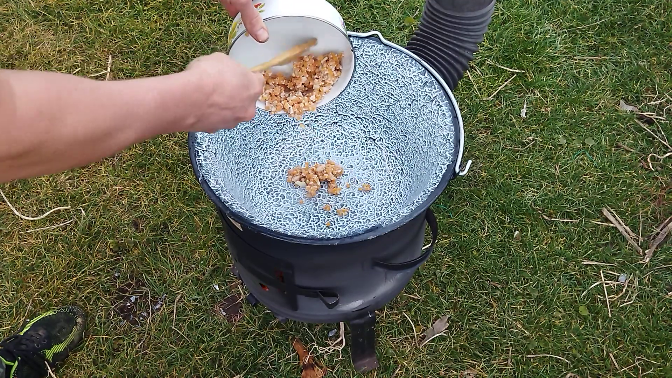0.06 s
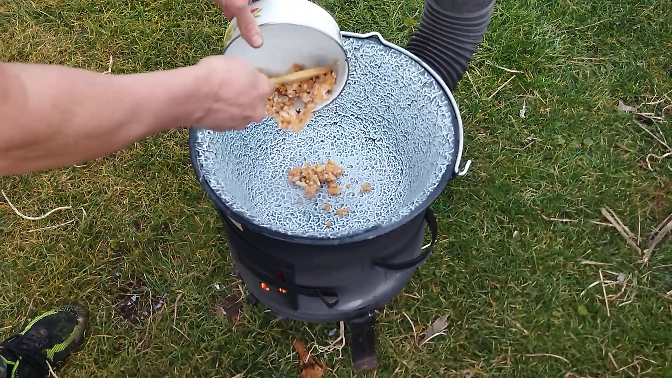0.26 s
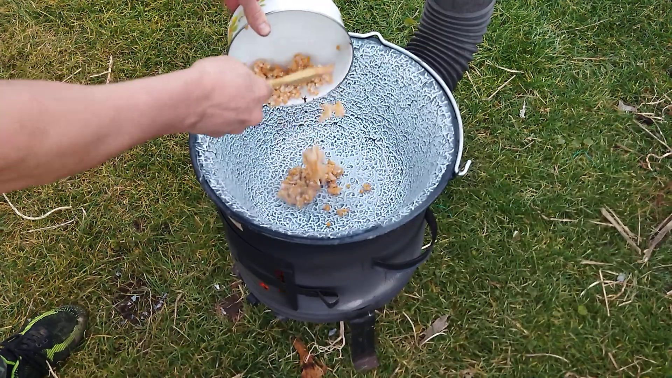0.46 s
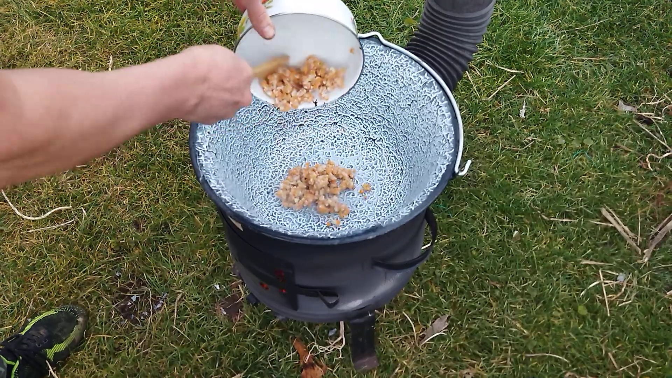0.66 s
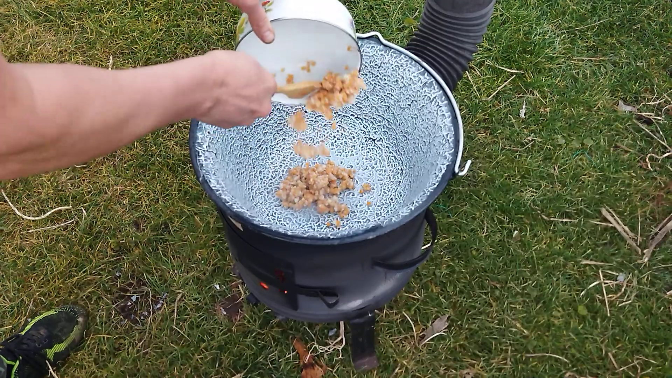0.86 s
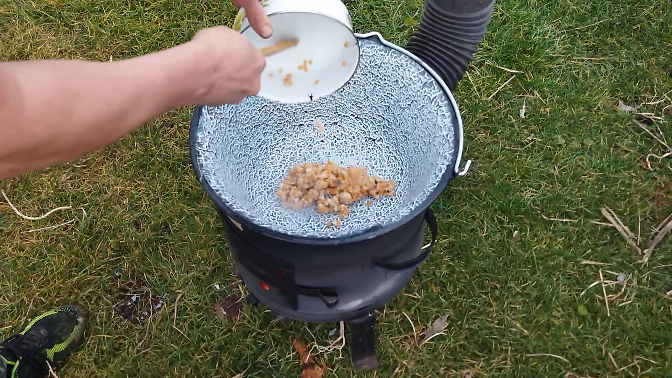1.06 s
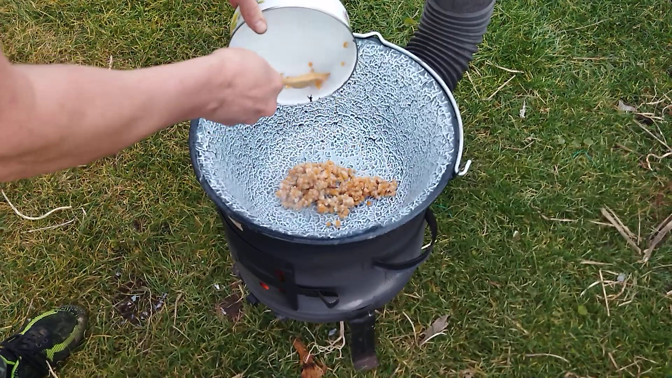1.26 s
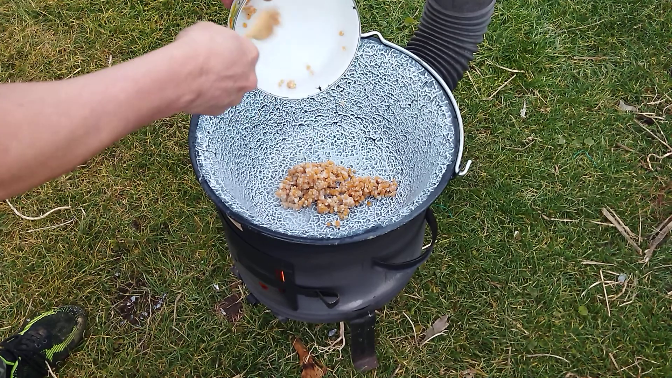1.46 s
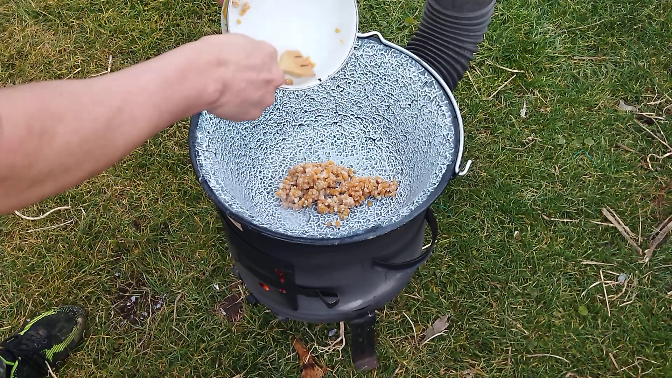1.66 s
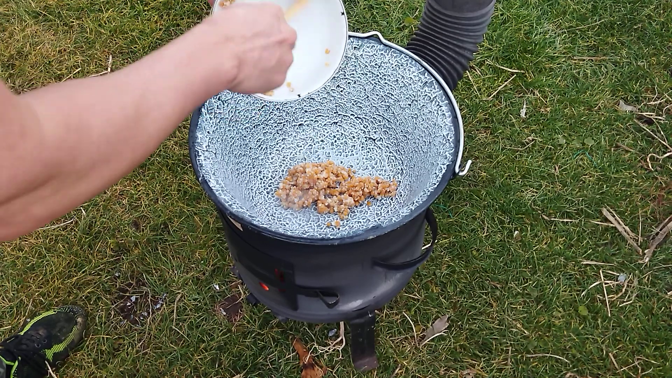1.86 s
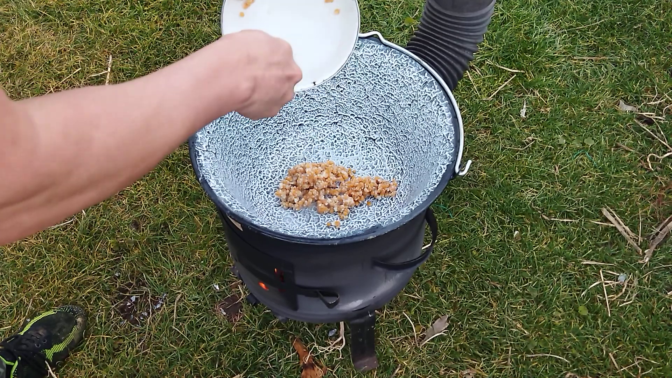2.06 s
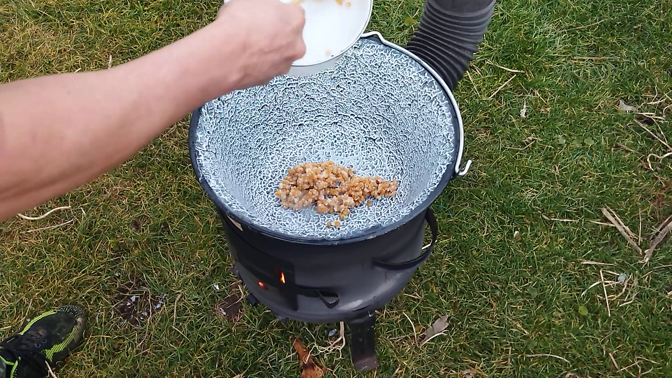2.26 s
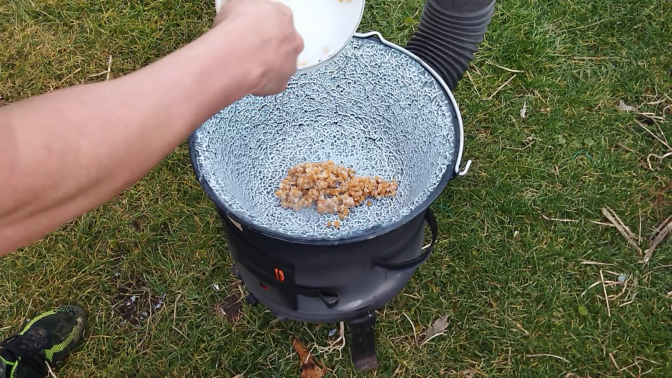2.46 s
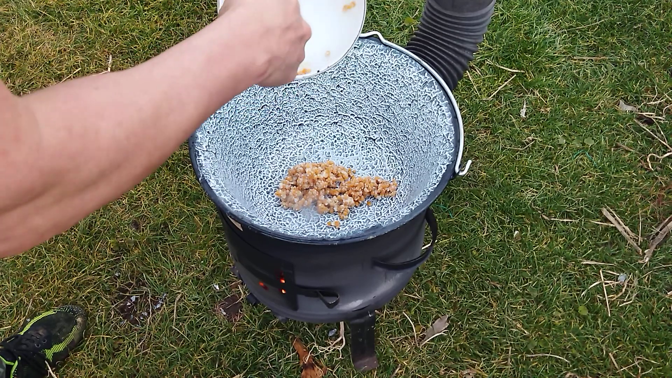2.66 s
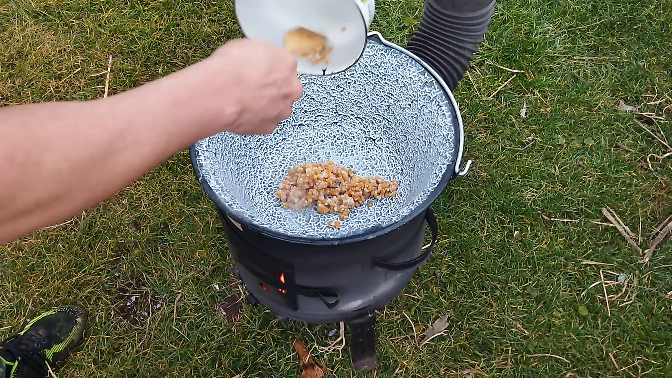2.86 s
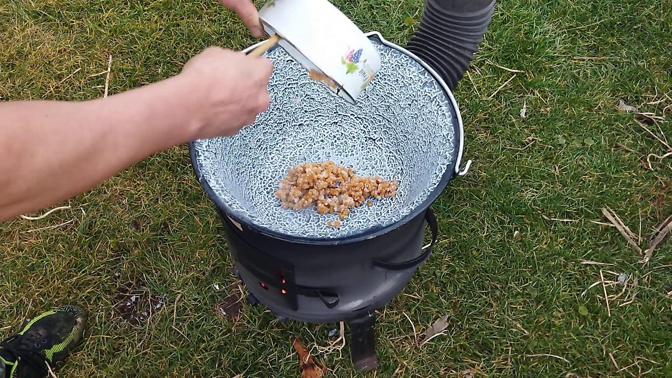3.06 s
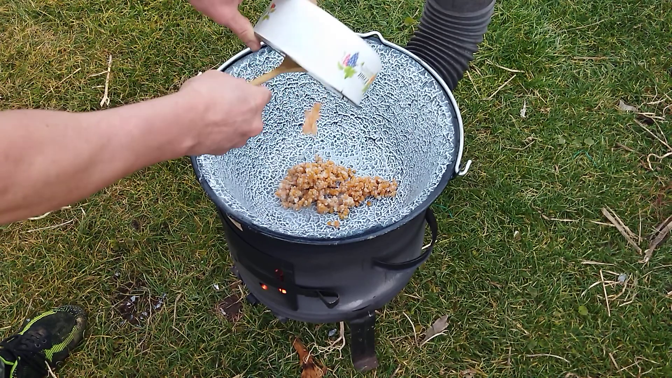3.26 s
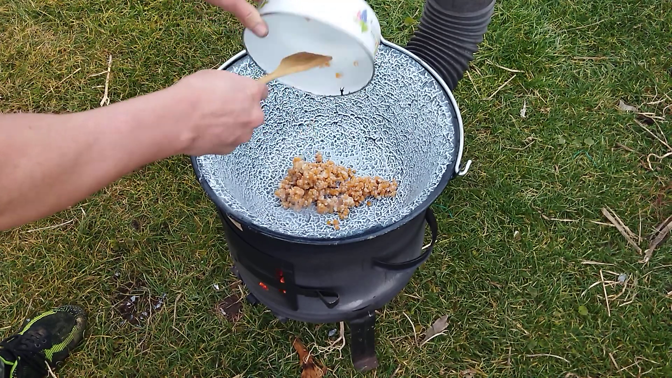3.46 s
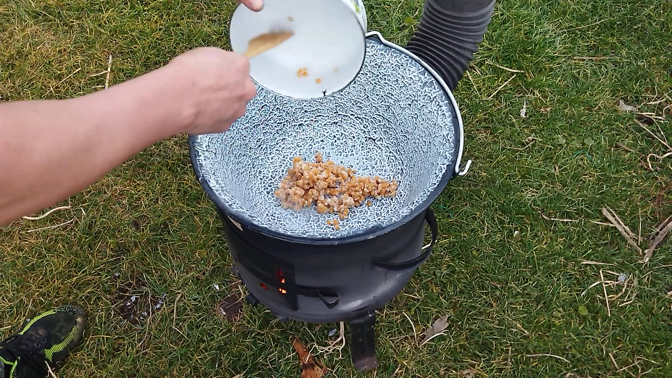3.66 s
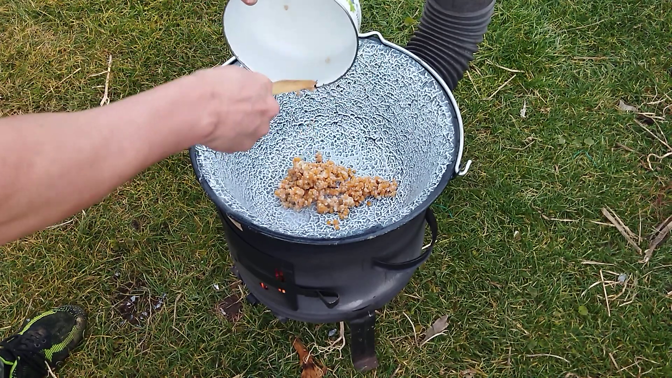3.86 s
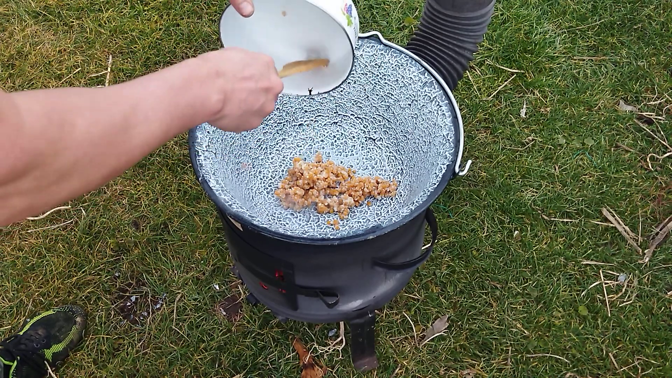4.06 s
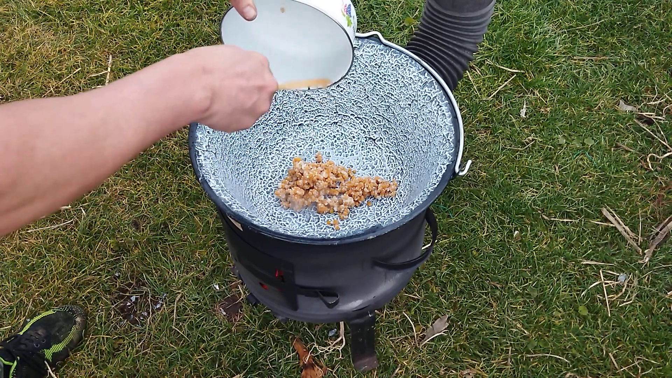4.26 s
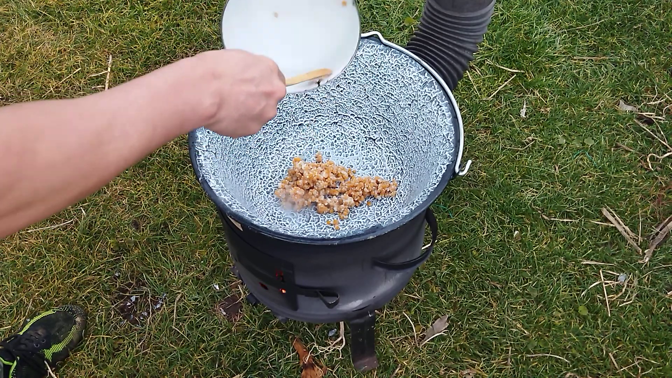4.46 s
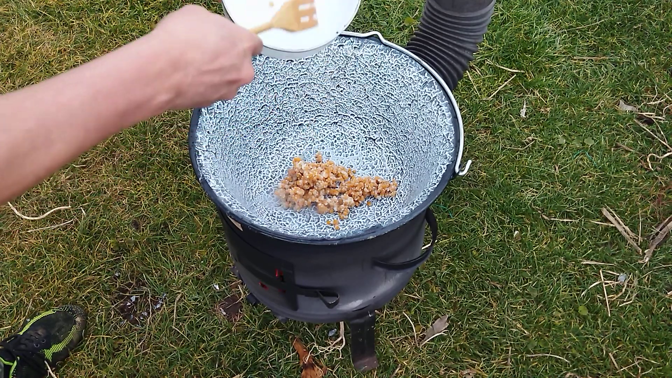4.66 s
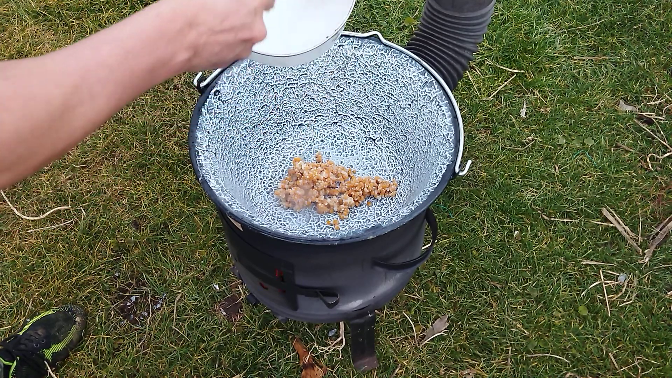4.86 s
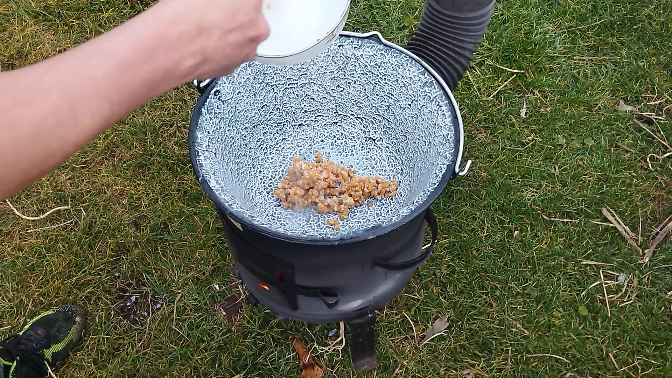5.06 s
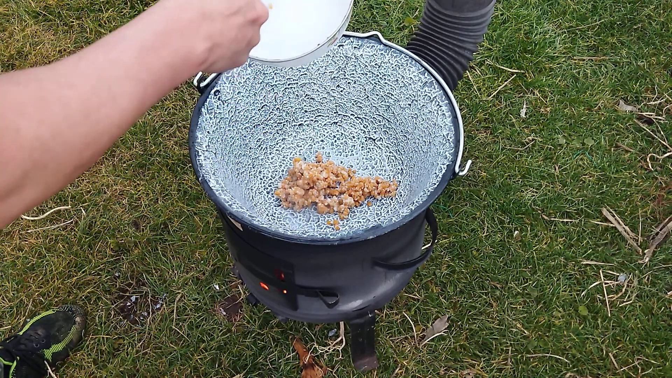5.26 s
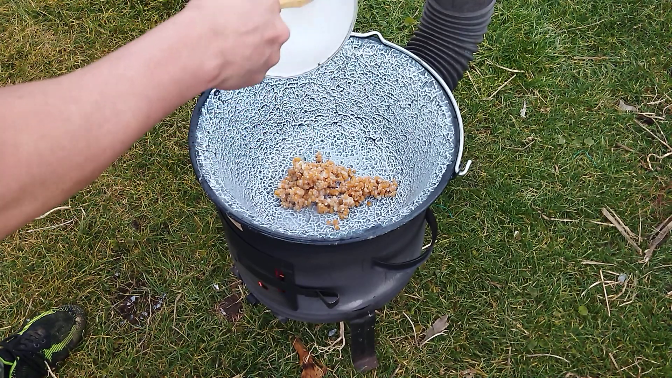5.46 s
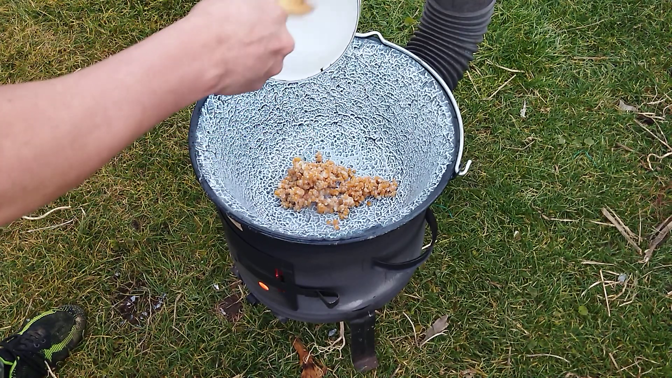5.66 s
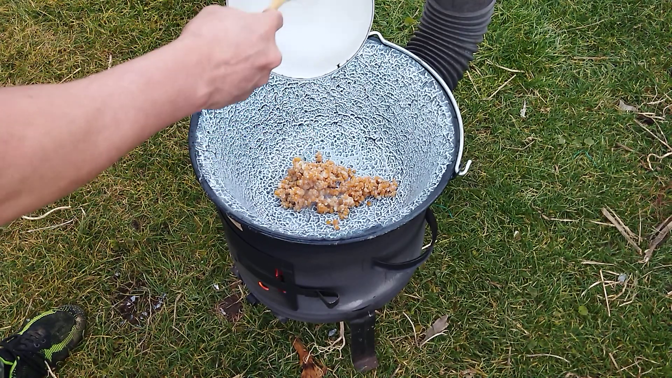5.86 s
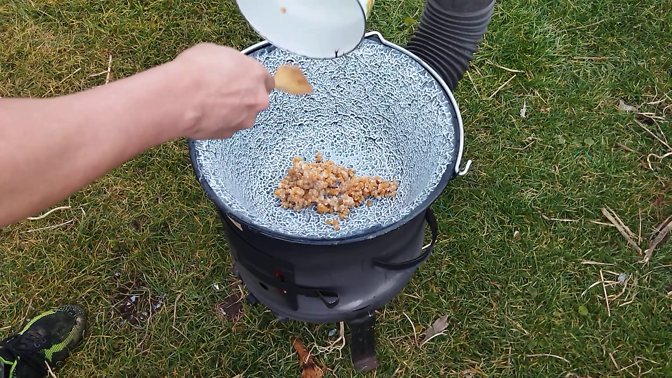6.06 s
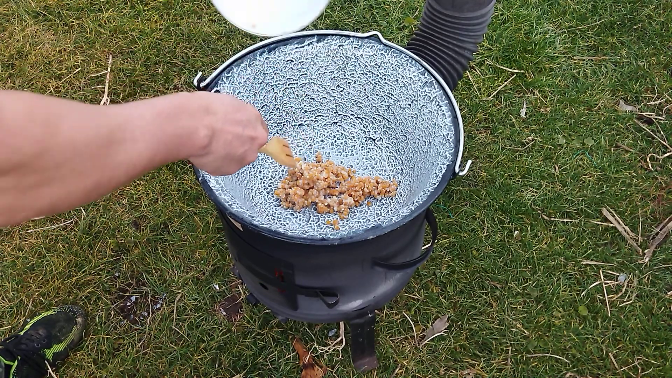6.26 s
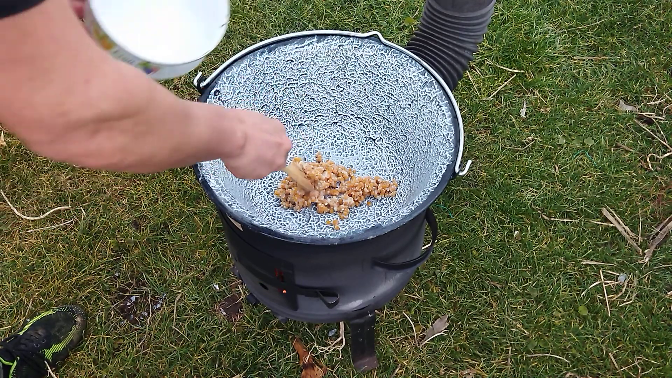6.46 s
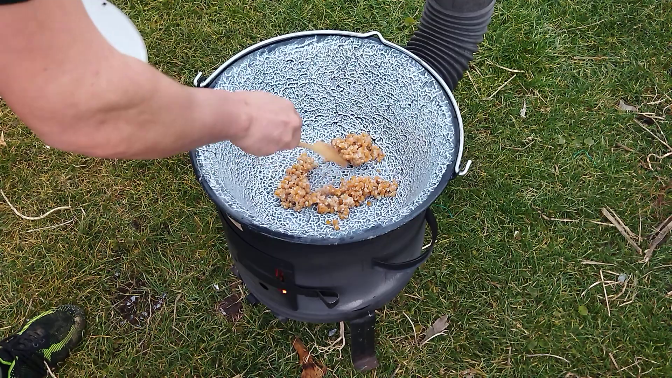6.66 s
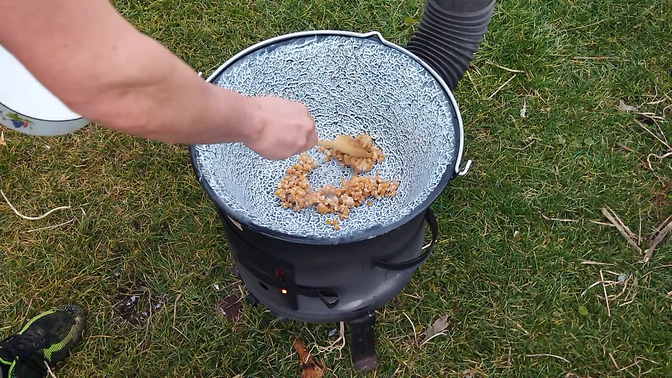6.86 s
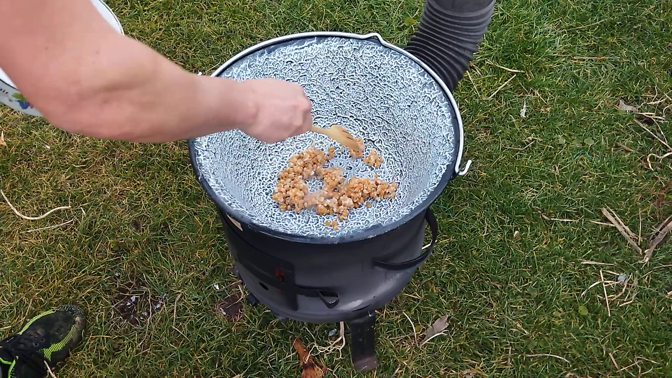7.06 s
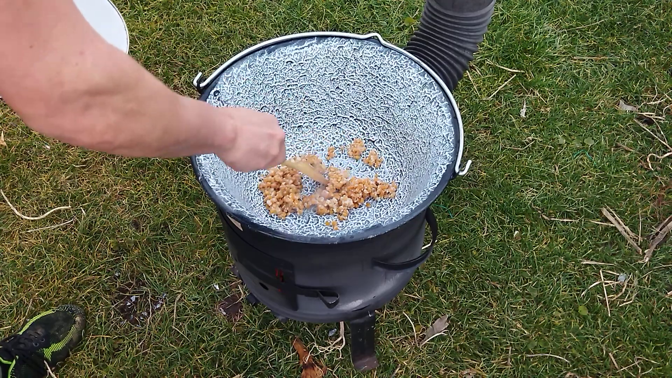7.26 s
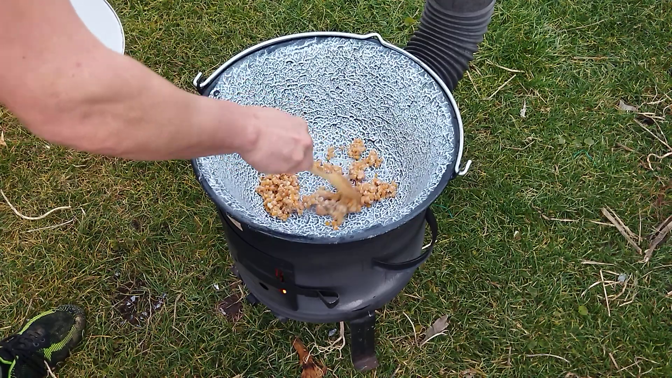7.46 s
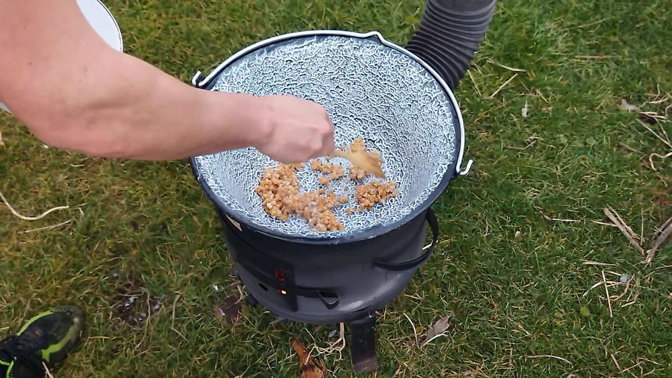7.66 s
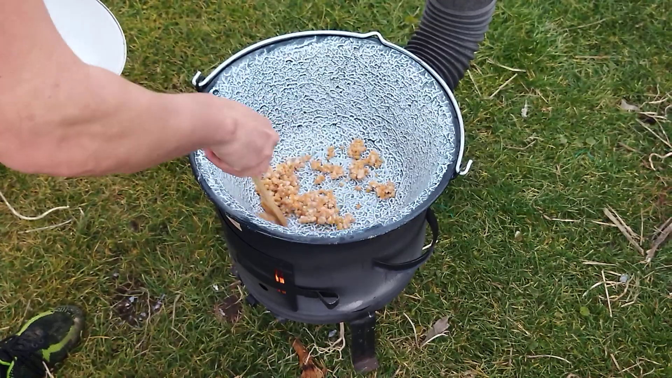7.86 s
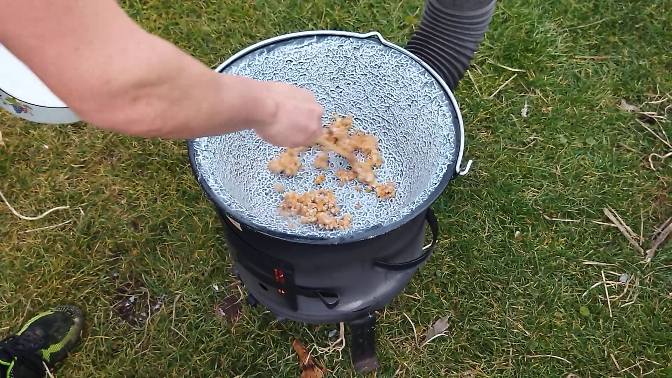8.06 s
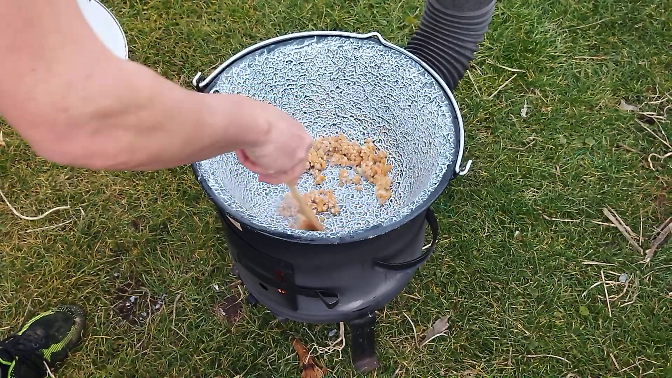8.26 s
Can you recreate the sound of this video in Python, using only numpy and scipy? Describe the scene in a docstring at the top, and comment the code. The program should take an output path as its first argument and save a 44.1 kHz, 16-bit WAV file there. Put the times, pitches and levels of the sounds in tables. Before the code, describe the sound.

Greasy kernels splash in clumps into a hot enamel pot, a wooden spoon knocks a bowl hollowly, then stirring scrapes as sizzling swells outdoors.

```python
"""A wooden spoon knocks a hand-held enamel bowl empty: two beating low modes, a dull thump and a wooden clack.
Greasy popcorn kernels splash in clumps into a hot enamel pot: showers of random grains and ringing modes.
Then the spoon stirs and bumps the pot, whose short damped modes are struck and ground by random clicks.
The fat sizzles as trains of tiny clicks and swells late on; below, a small wood stove outdoors gives coloured
noise, its flue hums as two wavering sines, soft low thuds are damped sines, and open air is faint steady noise."""
import sys
import numpy as np
from scipy import signal
from scipy.fft import rfft, irfft, next_fast_len
from scipy.io import wavfile

SR = 44100
rng = np.random.default_rng(int(sys.argv[2]) if len(sys.argv) > 2 else 0)


def dump(signal):
    """Clip the signal to [-1, 1] and save it as 16-bit WAV at the path in sys.argv[1]."""
    limited = np.clip(np.atleast_2d(signal).T, -1, 1)
    pcm = np.round(limited * 32767).astype(np.int16)
    wavfile.write(sys.argv[1], SR, pcm)


N = 366030
T = np.arange(N) / SR
AGE = T[:SR // 3]   # time since a hit [s]


def from_db(db):
    """Decibels: 20 dB is a tenfold amplitude."""
    return 10 ** (np.asarray(db) / 20)


def rms_one(x):
    """Normalization: unit effective value."""
    return x / np.sqrt(np.mean(x ** 2) + 1e-20)


def onset_one(x):
    """Onset normalization: unit effective value over the first 12 ms of a hit."""
    onset = x[..., :round(.012 * SR)]
    return x / np.sqrt(np.mean(onset ** 2) + 1e-20)


def add(out, s, sound):
    """Superposition: mix a sound in at a time in seconds."""
    at = max(0, round(s * SR))
    out[..., at:at + sound.shape[-1]] += sound[..., :N - at]


def in_time(rows):
    """Linear interpolation: a (time, value) curve at every sample."""
    return np.interp(T, *np.transpose(rows))


def colour(x, points):
    """Spectral shaping: filter by a (frequency, gain) curve, straight over log frequency."""
    size = x.shape[-1]
    hz, db = np.transpose(points)
    padded = next_fast_len(size)
    bins = np.maximum(np.fft.rfftfreq(padded, 1 / SR), 1)
    gain = from_db(np.interp(np.log(bins), np.log(hz), db))
    return irfft(rfft(x, padded) * gain, padded)[..., :size]


# stereo width of diffuse sound: (frequency [Hz], side minus mid [dB])
STEREO_WIDTH = [(60, -12), (400, -11), (1000, 2), (2400, -9.5), (4400, -3), (8000, 0), (15000, -0.5)]


def spread(pair, spectrum):
    """Decorrelation: two unrelated signals become mid and side of one coloured stereo sound of rms 1."""
    mid, side = colour(pair, spectrum)
    side = colour(side, STEREO_WIDTH)
    return rms_one(np.array([mid + side, mid - side]))


def drift(rate):
    """Random modulation: straight lines between normal knots of unit spread, `rate` knots a second."""
    knots = rng.standard_normal(int(T[-1] * rate) + 2)
    return np.interp(T * rate, np.arange(len(knots)), knots)


def grains(per_s, spread_db, size):
    """Shot noise: two trains of random clicks of uneven strength and random sign."""
    born = rng.random((2, size)) < per_s / SR
    sign = rng.choice([-1, 1], (2, size))
    strength = from_db(spread_db * np.minimum(rng.exponential(1, (2, size)), 4))
    return born * sign * strength


def shower(spectrum, per_s, lumpy_db):
    """Clustered shot noise: grains that arrive in lumps, a few milliseconds apart."""
    knots = np.arange(0, AGE[-1], .003)
    lump_db = lumpy_db * np.clip(rng.standard_normal(len(knots)), -1.7, 1.7)
    lumps = from_db(np.interp(AGE, knots, lump_db))
    return rms_one(lumps * spread(grains(per_s, spread_db=-2.5, size=len(AGE)), spectrum))


def fade(t60):
    """Exponential decay: 60 dB down after t60 seconds, at least 2 ms."""
    return from_db(-60 * AGE / max(t60, .002))


def mode(hz, t60, contact_s):
    """Modal vibration: a damped sine that builds up over the contact time."""
    return np.sin(2 * np.pi * hz * AGE) * fade(t60) * (1 - np.exp(-(AGE / contact_s) ** 2))


def struck(modes, contact_s, uneven_db, flipped):
    """Modal excitation: the spot struck sets each mode's strength; a random share starts inverted."""
    out = np.zeros(len(AGE))
    for hz, db, t60 in modes:
        strength = from_db(db + uneven_db * rng.normal())
        sign = np.sign(rng.random() - flipped)
        out += sign * strength * mode(hz, t60, contact_s)
    return onset_one(out)


def ringing(clicks, modes):
    """Linear convolution: every click sets a table of modes ringing."""
    body = np.zeros(len(AGE))
    for k, (hz, db, t60) in enumerate(modes):
        body += (-1) ** k * from_db(db) * mode(hz, t60, contact_s=.0001)
    return signal.fftconvolve(clicks, body / np.sqrt(np.sum(body ** 2)))[:len(clicks)]


def favour(table, centre_hz, octave_db):
    """Position-dependent excitation: modes or bands fall off by the octave from a favoured frequency."""
    return [(hz, db - octave_db * abs(np.log2(hz / centre_hz)), *rest) for hz, db, *rest in table]


def damped(modes, share):
    """Contact damping: every mode's ring is scaled by one share."""
    return [(hz, db, t60 * share) for hz, db, t60 in modes]


def crack(t60, low_hz, high_hz):
    """Contact noise: the brief gritty crunch is a band-limited noise burst."""
    band = signal.butter(2, [low_hz, min(high_hz, .45 * SR)], "band", fs=SR, output="sos")
    burst = rng.standard_normal(len(AGE)) * fade(t60) * (1 - np.exp(-AGE / 0.0041))
    return onset_one(signal.sosfilt(band, signal.sosfilt(band, burst)))


# skitter after a knock: level against the clack [dB], touches [1/s], decay [s]
CHATTER_DB, CHATTER_PER_S, CHATTER_T60_S = -12.5, 330, 0.1


def chatter(hz, wall_hz):
    """Repeated impact: tiny uneven rebounds of the spoon wake the two low modes, damped by its touch."""
    touches = grains(CHATTER_PER_S, spread_db=-2.0, size=len(AGE))[0] * fade(CHATTER_T60_S)
    body = mode(hz, .022, contact_s=0.00059) - mode(wall_hz, 0.019, contact_s=.0005)
    return signal.fftconvolve(touches, body)[:len(AGE)]


# thump under a knock: pitch [Hz], level at a firm knock [dB], its share of the level swing, firm knock [dB]
THUMP_HZ, THUMP_DB, THUMP_FOLLOWS, FIRM_KNOCK_DB = 351, -42, 0.35, -23
# the lowest mode's decay [s] at the usual ring [s]; it follows the grip only in part (exponent)
BASE_T60_S, USUAL_RING_S, BASE_FOLLOWS = 0.05, 0.061, 0.76
REST_HZ, REST_T60_S = 562, 0.076   # lowest mode while the spoon settles, before the load shift
# spoon on bowl; the grip sets pitches and ring, the spot struck the wall share and the clack's colour:
# (time [s], lowest mode before the load shift [Hz], level [dB], wall mode [Hz], wall above that level [dB],
#  ring t60 [s], clack before its trim [dB], clack centre [Hz])
BOWL_KNOCKS = [(0.042, 645, -27.5, 860, -7.5, 0.031, -31, 1050),
               (1.148, 606, -26.5, 850, -8, 0.025, -51, 1000),
               (1.259, 570, -37, 756, -34, 0.032, -44, 1000), (1.577, 562, -43.5, 750, -2, 0.1, -38, 1600),
               (1.602, 587, -28, 780, -34, 0.034, -41, 1810),
               (1.619, 604, -21, 820, -48, 0.079, -38.5, 1100),
               (1.889, 546, -43.5, 750, -10, 0.07, -41.5, 2880),
               (1.923, 576, -42.5, 785, -4, 0.065, -46, 1000),
               (2.3249, 582, -40, 763, 9.5, 0.097, -23.5, 990),
               (3.0522, 610, -11.5, 830, -4, .03, -17.5, 2430), (3.053, 627, -46, 835, -6, .029, -30, 4580),
               (3.2202, 608, -21, 727, -1.5, 0.05, -21.5, 2920),
               (3.2345, 610, -28, 731, 3.5, 0.057, -18.5, 1480),
               (3.252, 620, -31.5, 770, -8, 0.032, -29, 1870),
               (3.3633, 643, -19, 720, -7.5, 0.032, -18.5, 2800),
               (3.372, 597, -31, 748, 3, 0.044, -20.5, 1460), (3.388, 577, -36, 790, -8, 0.023, -33, 2500),
               (3.6973, 588, -19.5, 760, -43, 0.057, -31.5, 1820),
               (4.455, 555, -45, 755, -6, .089, -40, 1510), (4.847, 564, -30, 778, -3, 0.28, -30.5, 1680),
               (4.875, 480, -37, 650, -9, 0.023, -42, 1010), (4.971, 540, -34, 760, -18, 0.057, -44, 1450),
               (5.263, 562, -31.5, 777, -21, 0.055, -33.5, 1050),
               (5.495, 632, -31, 870, -21, 0.059, -31.5, 1000),
               (5.7706, 567, -39, 778, -10.5, 0.1, -28.5, 2960)]
# the spoon's greasy flat settles on the bowl between knocks: (time [s], level [dB])
SPOON_SETTLES = [(0.772, -47), (2.647, -51), (2.728, -49), (2.793, -51.5), (3.769, -40.5), (4.077, -46),
                 (4.117, -45.5), (5.22, -47.5), (5.384, -52), (5.58, -46), (5.958, -50)]
# upper modes of the bowl in the wooden clack: (frequency [Hz], relative level [dB], t60 [s])
BOWL_MODES = [(915, 4, .06), (975, 9, .04), (1398, 0, 0.059), (1532, 4, 0.047), (2033, -5, 0.055),
              (2517, 0.5, 0.035), (2880, -1, 0.031), (3230, -5.5, .022), (3790, -3.5, .014),
              (4120, -3, 0.023), (4685, 0, 0.024)]


def bowl_knocks(sag=0.022, settle_clack_db=-17, crack_top_hz=4200):
    """Beating modes: a hollow knock with a dull thump, its wooden clack and a skittering tail."""
    knocks, clacks = np.zeros((2, N))
    loaded = 1 + sag * (.5 - np.exp(-AGE / 0.0022))   # the pitch rises as the spoon lifts off
    for s, hz, db, wall_hz, wall_db, ring_s, clack_db, clack_hz in BOWL_KNOCKS:
        ring = ring_s / USUAL_RING_S
        base = onset_one(mode(hz * loaded, BASE_T60_S * ring ** BASE_FOLLOWS, contact_s=0.0014))
        wall = onset_one(mode(wall_hz, ring_s, contact_s=0.0011))
        body = from_db(db) * base - from_db(db + wall_db) * wall   # the wall swings against the bottom
        thump_db = THUMP_DB + THUMP_FOLLOWS * (db - FIRM_KNOCK_DB)   # soft taps are duller
        thump = from_db(thump_db) * onset_one(mode(THUMP_HZ, 0.033, contact_s=0.0011))
        spot = favour(damped(BOWL_MODES, min(ring, 1)), clack_hz, octave_db=16)
        clack = struck(spot, contact_s=0.0012, uneven_db=1.5, flipped=.5)
        crack_hz = min(clack_hz * 1.93, crack_top_hz)
        clack += from_db(-5.5) * crack(t60=0.035, low_hz=clack_hz / 5.2, high_hz=crack_hz)
        tail = from_db(clack_db + CHATTER_DB) * chatter(hz, wall_hz)
        add(knocks, s, body + thump + tail)
        add(clacks, s, from_db(clack_db - 11) * clack)
    for s, db in SPOON_SETTLES:
        rest = onset_one(mode(REST_HZ * loaded, REST_T60_S, contact_s=0.0016))
        clack = struck(BOWL_MODES, contact_s=.0006, uneven_db=6.5, flipped=.5)
        add(knocks, s, from_db(db) * rest)
        add(clacks, s, from_db(db + settle_clack_db) * clack)
    return knocks, clacks


# high modes of the pot's enamel wall, undamped: (frequency [Hz], relative level [dB], t60 [s])
ENAMEL_MODES = [(1680, 2, .09), (2150, 0, .08), (2830, -2, .11), (3240, -4, .08), (3510, -2, .1),
                (3745, -1, .11), (4290, -1, .12), (4460, -2, .09), (4815, -1, .13), (5170, -1, .11),
                (6040, -3, .11), (6780, -7, .1)]


def kernel_hits(centre_hz, count, gap_s=0.005, loss_db=1.5, click_db=-4.5):
    """Successive impacts: kernels land in turn, each with a short enamel tick of its own colour and weight."""
    out = np.zeros(len(AGE))
    for k in range(count):
        spot = favour(damped(ENAMEL_MODES, .2), centre_hz * 2 ** rng.normal(0, .4), octave_db=9)
        click = struck(spot, contact_s=.0001, uneven_db=4, flipped=.5)
        at = round((k + rng.random()) * gap_s * SR)
        weight_db = click_db - loss_db * k + rng.uniform(-5, 3)
        out[at:] += from_db(weight_db) * click[:len(AGE) - at]
    return out


def enamel_ring(centre_hz, share=.55, scatter=.02):
    """Mass loading: the wall rings near the spot struck; the clump slightly detunes and damps its modes."""
    loaded = []
    for hz, db, t60 in damped(ENAMEL_MODES, share):
        loaded.append((hz * (1 + scatter * rng.normal()), db, t60 * rng.uniform(.6, 1.3)))
    return struck(favour(loaded, centre_hz, octave_db=18), contact_s=.002, uneven_db=3, flipped=.5)


# resonances of the air in the pot: (frequency [Hz], half width [Hz], lift above the gaps [dB])
POT_AIR = [(3385, 160, 0.5), (4500, 300, 6), (5220, 130, 6), (5850, 100, 3.5), (6707, 170, 5),
           (7750, 160, 2.5), (8640, 82, 3), (9300, 140, 1.5), (9500, 90, 1), (10160, 100, 1),
           (11830, 110, 7.5), (12400, 100, 3.5)]


def hollow(x, between_db=-3.5):
    """Cavity resonance: the air in the pot lifts its own frequencies."""
    hz = np.linspace(20, SR / 2, 1000)
    db = np.full(len(hz), between_db)
    for centre, width, lift_db in POT_AIR:
        db += lift_db * np.exp(-((hz - centre) / width) ** 2)
    return colour(x, np.column_stack([hz, db]))


# clumps of kernels land in the fat; gains below lift the showers of rattle and splash:
# (time [s], rattle before gain [dB], rattle centre [Hz], splash before gain [dB], splash centre [Hz],
#  rise time constant [s], t60 [s], enamel ring [dB], ring centre [Hz])
SPLASHES = [(0.004, -36.5, 450, -55, 9400, .0022, 0.05, -55, 2840),
            (0.011, -41, 2000, -34, 9500, 0.0047, 0.12, -50, 3500),
            (0.023, -37.5, 4370, -39, 9800, .002, 0.15, -36, 4450),
            (0.146, -50.5, 4370, -48.5, 7760, .001, 0.079, -60, 4800),
            (0.5263, -41.5, 3480, -44.5, 9500, 0.0014, 0.12, -52, 5100),
            (0.5308, -37.5, 2370, -62, 8000, .0015, 0.016, -56, 3700),
            (0.5943, -42, 4700, -36.5, 9800, .001, 0.043, -50, 4900),
            (0.606, -43.5, 2500, -34, 9750, 0.0016, 0.12, -52, 3500),
            (0.628, -40.5, 2200, -33.5, 9300, .001, 0.067, -45, 4500),
            (0.658, -63, 1500, -40.5, 9300, .001, 0.059, -48, 4300),
            (0.6819, -33.5, 3530, -23.5, 11700, 0.0012, 0.049, -41, 3500),
            (0.689, -35, 2980, -25, 9000, .001, .055, -38, 4800),
            (1.126, -42.5, 900, -42, 8000, 0.0023, 0.086, -41, 2900),
            (1.1396, -39.5, 4500, -25.5, 12500, .0004, 0.076, -43, 6000),
            (1.155, -37, 3850, -25.5, 12100, 0.0013, 0.068, -37, 3760)]
# kernels rattling on enamel: (frequency [Hz], relative level per Hz [dB])
RATTLE_SPECTRUM = [(120, -26), (350, 20.5), (700, 11), (1200, 5), (2300, 2.5), (3000, 5.5), (3700, 3.5),
                   (4800, 4.5), (5800, 5), (9000, -32)]
# flash of frying: (frequency [Hz], relative level per Hz [dB])
SPLASH_SPECTRUM = [(2500, -39), (4500, -18.5), (6000, -2.5), (7500, -4.5), (9300, 4.5), (11000, -0.5),
                   (12500, 1.5), (14000, -1.5), (16000, -7.5)]


def splashes(tail_db=-26, tail_stretch=2.4, rattle_gain_db=5.0, splash_gain_db=5.0):
    """Impact shower: each clump is many hard hits and a flash of frying, with single kernels standing out."""
    out = np.zeros((2, N))
    for s, rattle_db, rattle_hz, splash_db, splash_hz, rise_s, t60, ring_db, ring_hz in SPLASHES:
        decay = fade(t60) + from_db(tail_db) * fade(t60 * tail_stretch)
        shape = onset_one((1 - np.exp(-AGE / rise_s)) * decay)
        rattle = shower(favour(RATTLE_SPECTRUM, rattle_hz, octave_db=3.5), per_s=900, lumpy_db=4)
        splash = shower(favour(SPLASH_SPECTRUM, splash_hz, octave_db=6), per_s=14000, lumpy_db=2)
        both = from_db(rattle_db + rattle_gain_db) * rattle + from_db(splash_db + splash_gain_db) * splash
        add(out, s, shape * hollow(both))
        add(out, s, from_db(rattle_db) * kernel_hits(rattle_hz, count=5))
        add(out, s, from_db(ring_db) * enamel_ring(ring_hz))
    return out


SPOON_DAMPING = 0.46   # share of the enamel's ring left under the spoon


def pressed_enamel(centre_hz=1700, octave_db=6):
    """Contact damping: under the wooden spoon the enamel rings shorter and duller."""
    return favour(damped(ENAMEL_MODES, SPOON_DAMPING), centre_hz, octave_db)


# the spoon meets the pot, once at the rim and then stirring; each stroke grinds and peaks in a bump:
# (time [s], bump [dB], wall [dB], grit before trims [dB], bottom rumble [dB], swell time constant [s])
SPOON_STROKES = [(2.3269, -37.5, -39, -54, -78, 0.0055), (6.562, -29, -47, -39.5, -34, 0.011),
                 (6.574, -30, -37, -47, -57, .008), (6.5811, -40, -51, -44, -60, .004),
                 (6.591, -25.5, -23.5, -37.5, -34.5, 0.009), (6.953, -37, -41.5, -39, -41.5, 0.0093),
                 (7.079, -65, -51, -61, -68, .012), (7.274, -28, -25.5, -41.5, -44, 0.022),
                 (7.546, -35.5, -53, -35.5, -39, 0.016), (7.552, -26, -26, -38, -44, 0.0093),
                 (7.81, -37.5, -45.5, -40.5, -38.5, 0.011), (8.006, -61, -60, -57, -40, 0.0095),
                 (8.059, -57, -51, -45, -39, 0.025)]
# the pot's bottom: (frequency [Hz], relative level [dB], t60 [s])
POT_BOTTOM = [(203, -22, 0.031), (236, -23.5, 0.022), (347, -11, 0.034), (405, -3.5, 0.053),
              (409, 2.5, 0.027), (440, 1, 0.019)]
# the pot's wall: (frequency [Hz], relative level [dB], t60 [s])
POT_WALL = [(647, -5.5, 0.037), (820, 5.5, 0.019), (860, 8.5, 0.014), (980, -3, 0.023), (1235, -6.5, 0.041)]


def pot_knocks(clack_db=-11.0):
    """Boundary damping: the pot sits tight on the stove, so its thuds are low and short, with wall and clack."""
    out = np.zeros(N)
    for s, db, wall_db, grit_db, _, _ in SPOON_STROKES:
        thud = from_db(db) * struck(POT_BOTTOM, contact_s=0.00038, uneven_db=4.5, flipped=0)
        wall = from_db(wall_db) * struck(POT_WALL, contact_s=0.00012, uneven_db=2.5, flipped=0)
        clack = struck(pressed_enamel(), contact_s=0.00028, uneven_db=2.5, flipped=.5)
        clack += from_db(6.0) * crack(t60=0.06, low_hz=1100, high_hz=4500)
        add(out, s, thud + wall + from_db(grit_db + clack_db) * clack)
    return out


FADE_S = 0.02   # time constant of the grinding after each bump


def stirring():
    """Friction excitation: kernels grind between spoon and enamel and excite the wall and the bottom."""
    grit, rumble = np.zeros((2, N))
    for s, _, _, grit_db, rumble_db, swell_s in SPOON_STROKES:
        away = np.maximum((s - T) / swell_s, (T - s) / FADE_S)
        push = np.exp(-np.minimum(away, 20))
        grit += from_db(grit_db) * push
        rumble += from_db(rumble_db) * push
    slips, rolls = rms_one(grains(per_s=320, spread_db=3.0, size=N))
    enamel = from_db(-1.0) * ringing(slips * grit, pressed_enamel())
    wall = from_db(-4) * ringing(rolls * grit, POT_WALL)
    crunch = from_db(-6.0) * grit * rms_one(colour(slips, RATTLE_SPECTRUM))
    bottom = ringing(rolls * rumble, favour(POT_BOTTOM, centre_hz=240, octave_db=35))
    return enamel + wall + crunch + bottom


# single hard ticks of kernel, spoon or spitting fat, begun 1 ms before the listed time:
# (time [s], body before trim [dB], body centre [Hz], snap before trim [dB], t60 [s])
TICKS = [(0.986, -52, 2000, -56, .04), (1.241, -41.5, 1500, -69, 0.016), (1.381, -50, 3000, -54.5, 0.01),
         (1.7, -34, 2080, -41.5, 0.045), (1.708, -41.5, 605, -57, 0.012), (2.327, -35.5, 2000, -49, 0.011),
         (2.891, -42, 5600, -44, 0.036), (2.998, -45, 2300, -48.5, 0.017), (3.156, -64, 4010, -49.5, 0.021),
         (3.322, -34.5, 2580, -40.5, 0.041), (4.094, -56, 2980, -61, 0.045),
         (4.146, -38.5, 3480, -55, 0.11), (4.451, -37.5, 1780, -43, .051), (5.772, -31.5, 2420, -36, 0.038),
         (6.243, -57, 4000, -54, .02), (6.5341, -34.5, 2690, -54, 0.0026), (7.079, -52, 2500, -47, 0.063)]


def ticks():
    """Impulsive noise: dry, very short snaps are enveloped noise in a body band and a splash band."""
    out = np.zeros((2, N))
    for s, body_db, body_hz, snap_db, t60 in TICKS:
        body_spectrum = favour(RATTLE_SPECTRUM, body_hz, octave_db=7.5)
        body = spread(rng.standard_normal((2, len(AGE))), body_spectrum)
        snap = spread(rng.standard_normal((2, len(AGE))), SPLASH_SPECTRUM)
        shape = onset_one(fade(t60) * (1 - np.exp(-AGE / 0.0011)))
        add(out, s - .001, shape * (from_db(body_db - 6.0) * body + from_db(snap_db + 2.5) * snap))
    return out


# steady simmer before trims: fine hiss [dB], coarse bubbling [dB], the coarse share of the level swing
SIMMER_DB, COARSE_DB, COARSE_FOLLOWS = -52.5, -55.5, 0.84
# the top of the hiss is brighter when the hiss is louder:
# edge [Hz], level at a simmer [dB], gain per dB of louder hiss [dB]
TREBLE_HZ, TREBLE_DB, TREBLE_PER_HISS_DB = 12500, -3, 0.22
# frying while the kernels lie still: (time [s], fine hiss before trims [dB])
FRYING_STILL = [(0.0, -48), (0.18, -89.5), (0.39, -59), (0.48, -74), (0.77, -55.5), (0.98, -61.5),
                (1.52, -64.5), (2.1, -57.5), (3.3, -54), (4.8, -51), (6.45, -51)]
# frying once they are stirred: (time [s], fine hiss before trims [dB])
FRYING_STIRRED = [(6.62, -46), (7.072, -42.5), (7.152, -47), (7.438, -47.5), (7.84, -40.5), (8.154, -30.5),
                  (8.3, -36.5)]
# coarse bubbling: (frequency [Hz], relative level per Hz [dB])
COARSE_SIZZLE = [(200, -14.5), (330, 2), (600, -15), (1200, -9), (2200, -1.5), (3300, 1.5), (4500, -2),
                 (6500, -4.5), (8000, -13.5), (12000, -40.5)]
# fine hiss before the treble change: (frequency [Hz], relative level per Hz [dB])
FINE_SIZZLE = [(3000, -35), (6000, -24), (7500, -9.5), (8300, -8), (9000, 0.5), (9700, -1.5), (10600, -2.5),
               (11300, -8.5), (12000, -2.5), (13500, 0), (16000, -3.5)]


def sizzle():
    """Bubble shot noise: steam bubbles burst in the fat, more of them when louder; the level wavers slightly."""
    frying_db = in_time(list(FRYING_STILL) + list(FRYING_STIRRED))
    coarse_db = COARSE_DB + COARSE_FOLLOWS * (frying_db - SIMMER_DB)
    fine_db = frying_db + .5
    per_s = 3000 * from_db(.6 * (fine_db - SIMMER_DB))
    # dividing by the root of the rate keeps the power independent of it
    coarse = spread(grains(per_s, spread_db=2.5, size=N) / np.sqrt(per_s), COARSE_SIZZLE)
    fine = spread(grains(per_s, spread_db=5.5, size=N) / np.sqrt(per_s), FINE_SIZZLE)
    top = colour(fine, [(TREBLE_HZ * .9, -60), (TREBLE_HZ, 0)])
    top_db = TREBLE_DB + TREBLE_PER_HISS_DB * np.clip(fine_db - SIMMER_DB, 0, 20)
    fine += top * (from_db(top_db) - 1)
    waver_db = 1.2 * drift(rate=18) + 1.6 * drift(rate=140)
    return from_db(waver_db) * (from_db(coarse_db + 0.5) * coarse + from_db(fine_db + 2.5) * fine)


# draught of the fire: (time [s], level before trim and wavering [dB])
DRAUGHT = [(0.0, -66), (0.32, -68.5), (1.0, -60.5), (1.8, -58), (2.3, -59.5), (2.96, -65), (3.44, -67.5),
           (4.51, -68), (5.18, -67), (6.52, -73.5), (8.3, -75.5)]
# boom of the flue: (frequency [Hz], relative level per Hz [dB])
FIRE_SPECTRUM = [(25, -28), (55, -17), (78, -5), (92, -4), (108, -8), (122, 0), (150, -7.5), (175, -2.5),
                 (250, -6.5), (400, -11), (900, -27)]


def fire():
    """Turbulent excitation: the draught booms in the flue's low resonances, its level wavering at random."""
    level_db = in_time(DRAUGHT) + 3.5 + 3.5 * drift(rate=22.0)
    return spread(rng.standard_normal((2, N)), FIRE_SPECTRUM) * from_db(level_db)


UPPER_HUM_HZ = 137.6   # centre of the wavering pitch
# the flue's two lowest resonances, before wavering:
# (time [s], lower pitch [Hz], lower amplitude [dB], upper amplitude [dB])
FLUE_HUM = [(0.0, 95, -75, -82), (0.2, 89.3, -64, -76), (0.52, 91.2, -64, -74), (0.68, 89.3, -69, -59),
            (1.22, 91, -49.5, -59.5), (1.38, 91.4, -70, -61), (1.5, 96.5, -52, -59),
            (1.67, 101.4, -55, -66), (1.88, 88.5, -53, -58), (2.15, 91.1, -61.5, -71),
            (2.75, 89.8, -62, -63.5), (3.75, 90.3, -69.5, -70.5), (4.8, 89, -83, -76.5),
            (8.3, 89, -92.5, -73)]


def flue_hum(waver_hz=2.5, waver_db=2.0):
    """Air-column resonance: the flue sings softly in two sines whose pitch and level waver at random."""
    s, *columns = np.transpose(FLUE_HUM)
    lower_hz, lower_db, upper_db = [np.interp(T, s, column) for column in columns]
    out = np.zeros(N)
    for hz, db in ((lower_hz, lower_db), (UPPER_HUM_HZ, upper_db)):
        level = from_db(db + waver_db * drift(rate=13))
        phase = 2 * np.pi * np.cumsum(hz + waver_hz * drift(rate=7.0)) / SR
        out += level * np.sin(phase)
    return out


# soft low thuds: (time [s], level [dB], pitch [Hz])
LOW_THUDS = [(0.952, -52, 127), (1.123, -47.5, 230), (1.367, -50, 174), (1.797, -44, 173),
             (2.237, -46.5, 164)]


def low_thuds():
    """Damped oscillation: each soft low thud is one short sine that builds up gently."""
    out = np.zeros(N)
    for s, db, hz in LOW_THUDS:
        add(out, s, from_db(db) * onset_one(mode(hz, t60=0.055, contact_s=0.0054)))
    return out


# open air: (frequency [Hz], relative level per Hz [dB])
AIR_SPECTRUM = [(30, -29.5), (100, -1.5), (300, -2), (700, -2.5), (1500, -4), (3000, -10.5), (8000, -50),
                (16000, -37)]


def open_air():
    """Stationary noise: the outdoor background is steady, diffuse coloured noise."""
    return from_db(-59.5) * spread(rng.standard_normal((2, N)), AIR_SPECTRUM)


MIC_LAG_S = .00004   # delay of a point source at the right port


def inside_pot(x, echo_db, t60, dull_hz):
    """Reverberation: dense reflections between the walls; a point source reaches the left port first."""
    walls = rng.standard_normal((2, len(AGE))) * fade(t60) * (1 - np.exp(-AGE / 0.0016))
    walls = spread(walls, [(100, -10), (500, 0), (dull_hz, 0), (17000, -6)])
    walls /= np.sqrt(len(AGE))
    direct = x if x.ndim == 2 else np.array([x, np.interp(T - MIC_LAG_S, T, x)])
    return direct + from_db(echo_db) * signal.oaconvolve(direct, walls, axes=1)[:, :N]


def scene():
    """Superposition: bowl, kernels, pot and fat with pot reflections, over fire, thuds and the open air."""
    knocks, clacks = bowl_knocks()
    bowl = inside_pot(knocks, echo_db=-20.5, t60=0.22, dull_hz=4020)
    bowl += inside_pot(clacks, echo_db=-12.5, t60=0.12, dull_hz=4500)
    kernels = inside_pot(splashes(), echo_db=-9.5, t60=0.15, dull_hz=13060)
    bass_cut = signal.butter(4, 250, "high", fs=SR, output="sos")   # the pot's knocks and stirring are heard with little bass below 250 Hz
    pot = signal.sosfilt(bass_cut, pot_knocks() + stirring())
    pot = inside_pot(pot, echo_db=-20.0, t60=0.24, dull_hz=5000)
    snaps = inside_pot(ticks(), echo_db=-4.5, t60=0.074, dull_hz=9080)
    frying = from_db(0.44) * inside_pot(hollow(sizzle()), echo_db=0.5, t60=0.043, dull_hz=13900)
    background = fire() + flue_hum() + low_thuds() + open_air()
    return bowl + kernels + pot + snaps + frying + background


CUTOFF_HZ = 16000
# treble resonance of the left port: (frequency [Hz], left minus right [dB])
LEFT_LEAD = [(100, 0), (1000, 0.76), (4400, 0), (6200, 3), (7300, 3), (8800, 10), (10200, 0), (11500, 0.5),
             (16000, 0)]


def record(dry):
    """Port resonance and saturation: the left treble leads, loud peaks are rounded, the top is cut."""
    ports = []
    for channel, sign in zip(dry, (1, -1)):
        ports.append(colour(channel, [(hz, sign * db / 2) for hz, db in LEFT_LEAD]))
    ports = np.array(ports)
    ports = ports / (1 + (ports / .82) ** 4) ** .25
    return signal.sosfilt(signal.ellip(12, .1, 80, CUTOFF_HZ, fs=SR, output="sos"), ports)


dry = scene()
out = record(dry)
dump(out)
```